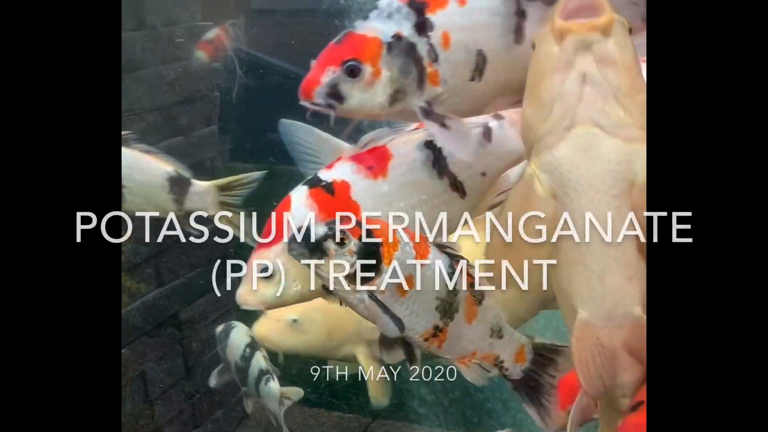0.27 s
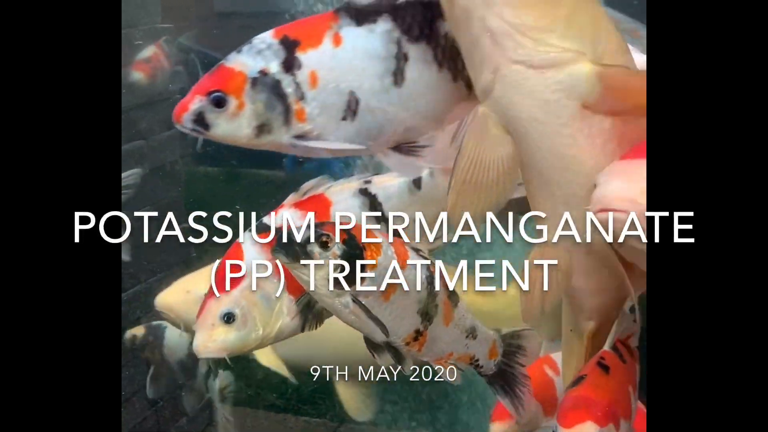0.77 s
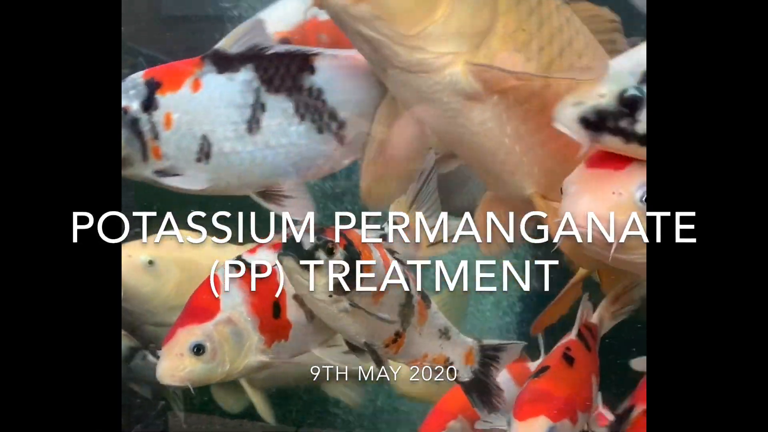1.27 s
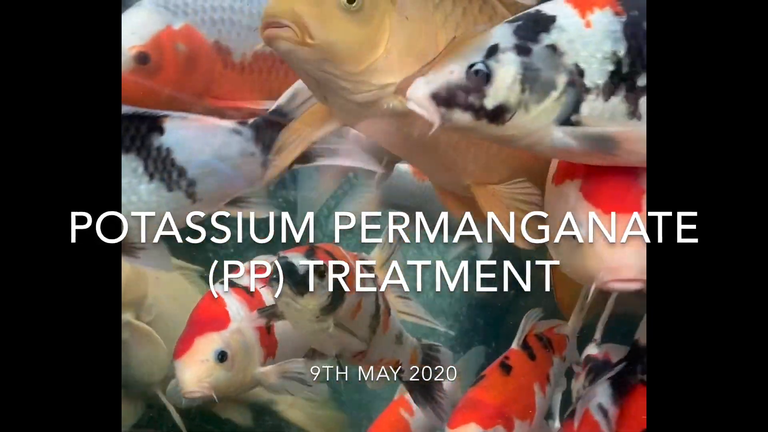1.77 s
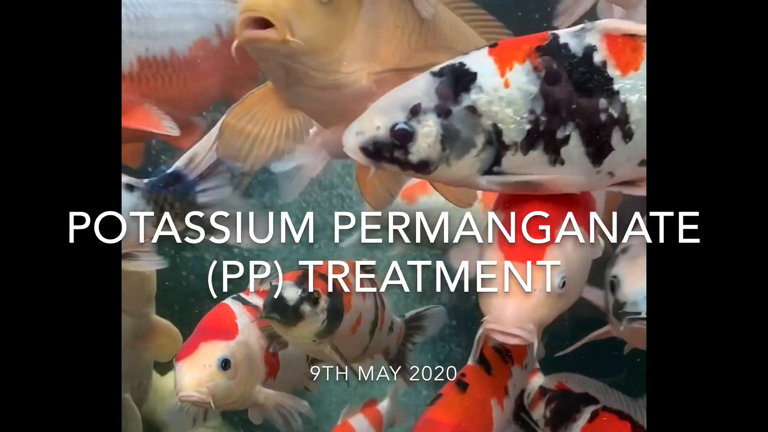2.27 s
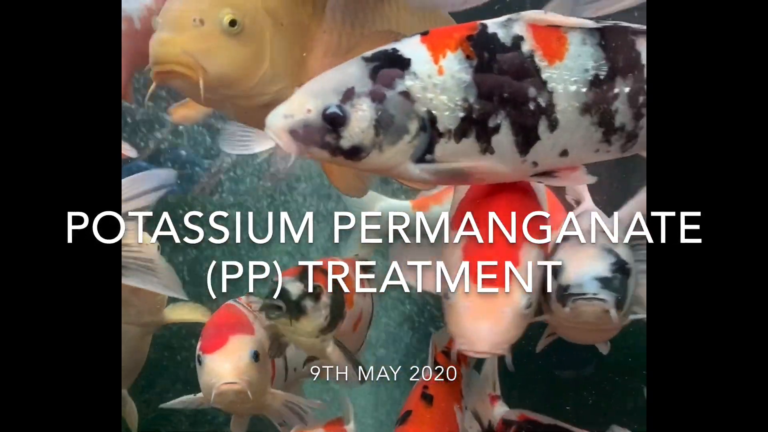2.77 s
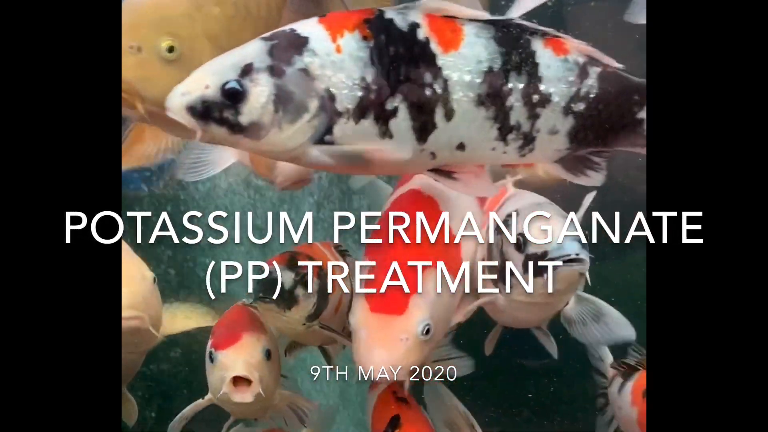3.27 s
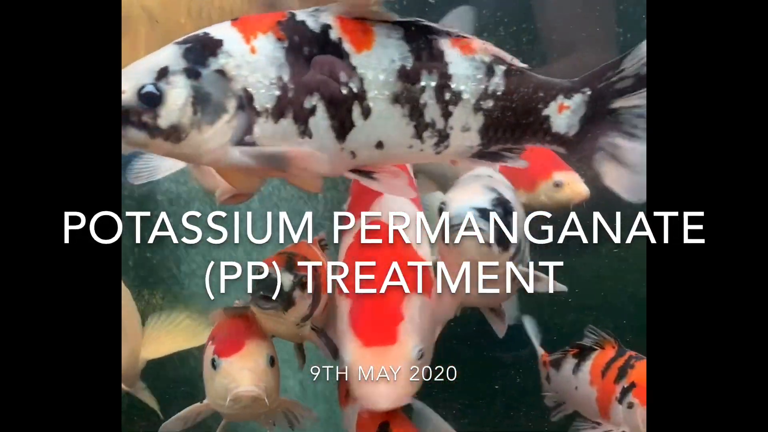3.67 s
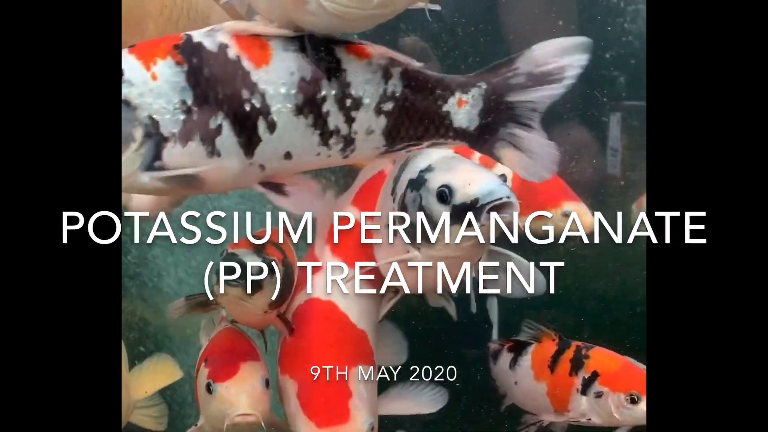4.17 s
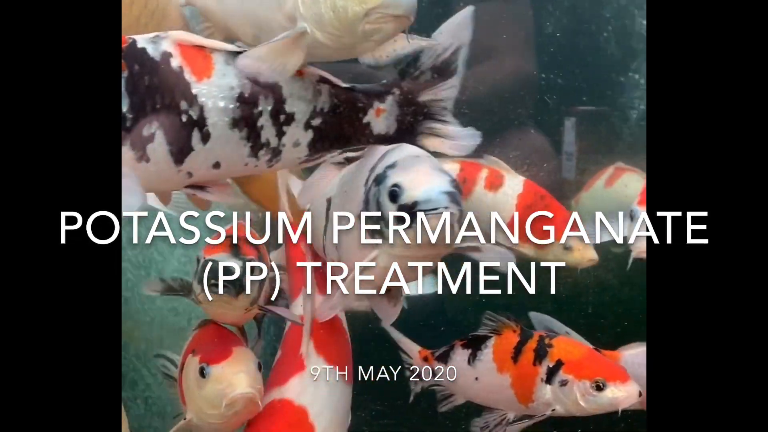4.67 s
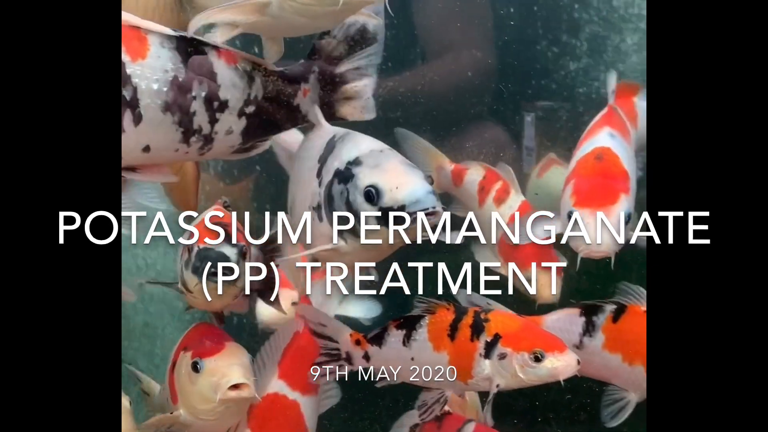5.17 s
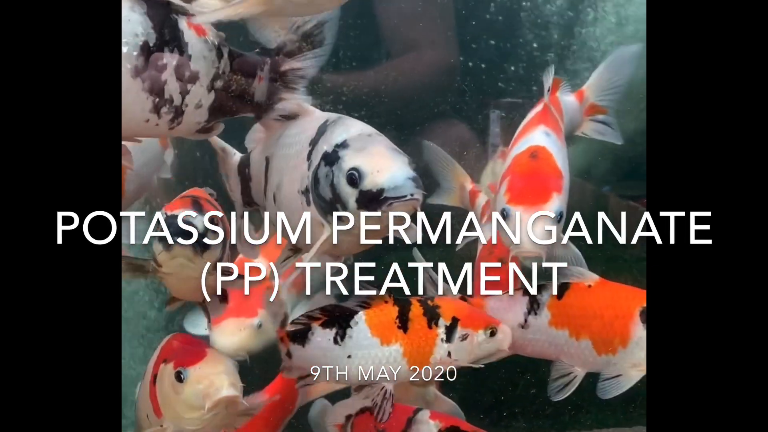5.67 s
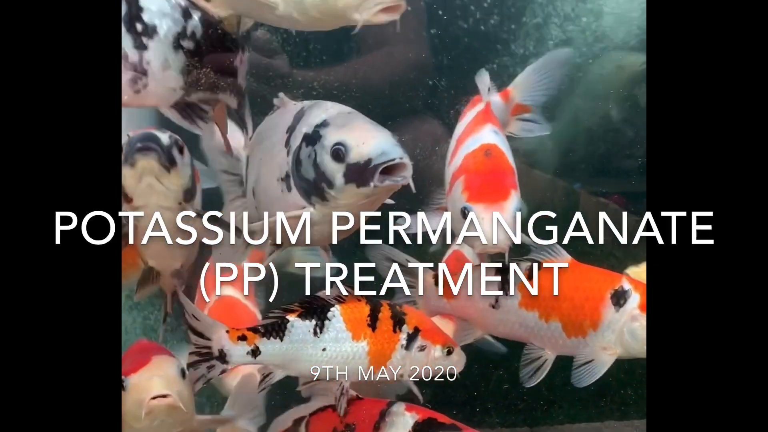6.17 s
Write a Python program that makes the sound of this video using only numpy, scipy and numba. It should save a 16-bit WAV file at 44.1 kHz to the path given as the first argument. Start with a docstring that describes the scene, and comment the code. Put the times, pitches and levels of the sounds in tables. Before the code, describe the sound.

Aerated fish pond heard close up: steady pump hum and drone under rumbling, fizzing water, with gurgling boils, small splashes and dull low thumps.

```python
"""Outdoor fish pond, beside its viewing window: pumps and aeration, heard at two close microphone ports.
An air pump hums at a drifting speed, as a sine and its octave; a water pump adds a drone and a whine.
Rising air makes the water rumble, slosh and fizz: shaped noise and swarms of ringing bubbles.
Boils well up through it, among small splashes, gliding glugs and dull, low thumps."""
import sys
import numpy as np
from scipy import signal
from scipy.fft import rfft, irfft
from scipy.io import wavfile
from numba import njit

SR = 44100
rng = np.random.default_rng(int(sys.argv[2]) if len(sys.argv) > 2 else 0)


def file_out(sig):
    """Save sig as 16-bit WAV at sys.argv[1]."""
    # one column per channel
    cols = np.atleast_2d(sig).T
    # limit, then scale
    lim = np.clip(cols, -1, 1)
    pcm = np.round(lim * 32767).astype(np.int16)
    wavfile.write(sys.argv[1], SR, pcm)


N = 283563
TIME = np.arange(N) / SR
BINS = np.fft.rfftfreq(N, 1 / SR)

# Air pump, levels before trim and waver: t/s, shaft f/Hz, hum level/dB, octave level/dB
AIR_PUMP = [(0, 41.6, -50, -68), (0.6, 41.95, -49, -66), (1.15, 42.4, -50, -50), (1.5, 45.55, -59, -63),
            (1.95, 48.8, -47.5, -46.5), (2.12, 48.6, -56, -48.5), (2.28, 49.25, -39.5, -60),
            (2.5, 49.9, -47, -62), (3.0, 49.84, -43.5, -54), (3.35, 49.06, -49.5, -46.5),
            (3.6, 49.4, -46.5, -52.5), (4.1, 49.55, -46.5, -47.5), (4.38, 47.4, -68, -60),
            (4.65, 43.1, -47, -60), (5.3, 42.94, -50.5, -50.5), (5.699, 41.7, -49, -55),
            (5.951, 41.5, -46, -59), (6.43, 41.4, -52, -59)]
# Spells in which the water pump's whine sings out: start t/s, length t/s, level/dB over a faint rest level
WHINE = [(0.428, 0.21, -61), (0.935, 0.12, -54.5), (1.05, 0.42, -58.5), (3.168, 0.092, -55),
         (3.294, 0.22, -55.5), (3.761, 0.068, -55), (3.933, 0.24, -55.5), (5.157, 0.17, -54.5),
         (5.61, 0.236, -55), (5.818, 0.25, -59), (6.19, 0.28, -55)]
WHINE_REST_DB, WHINE_EDGE_S = -67.5, 0.043  # level between spells; fade in and out of a spell

# How hard the aeration runs, used as the swing about its median: t/s, level/dB
AERATION = [(0, -55.5), (.6, -54.5), (1.5, -55), (2.05, -53), (2.6, -54), (3.2, -53.5), (3.8, -55.5),
            (4.9, -53), (6.43, -54.5)]
# Boils of air breaking the surface, before each layer's trim: crest t/s, level/dB, build-up t/s
BOILS = [(1.12, 6, 0.14), (2.04, 5, 0.16), (2.17, 7.5, 0.16), (2.43, 0, 0.089), (2.93, 4, 0.044),
         (4.16, 0, 0.25), (4.54, 7.5, 0.15), (4.64, 6.5, 0.055), (4.89, 6.5, 0.14), (5.05, 6.5, 0.08),
         (5.85, 5, 0.23), (6.041, 6, 0.093), (6.22, 0, 0.11)]
COLLAPSE_S = 0.045  # time constant after a crest

# Spectrum of moving water, before layer trims: f/Hz, level/dB per Hz
WATER = [(12, -102), (20, -87), (30, -85), (42, -67.5), (60, -60.5), (85, -66.5), (115, -64.5), (150, -70),
         (215, -75.5), (300, -74), (370, -79.5), (450, -78), (750, -82.5), (1120, -77), (1380, -86.5),
         (2700, -88.5), (3400, -89)]
# Spectrum of bursting bubbles, before layer trims: f/Hz, level/dB per Hz
FIZZ = [(1000, -104), (2600, -91.5), (3100, -85), (3600, -82.5), (4200, -87), (5300, -87), (6800, -87.5),
        (7700, -91), (8400, -87.5), (10000, -88.5), (11000, -92.5), (11900, -90.5), (14200, -95),
        (14700, -92.5), (15500, -101)]
# Resonances of the pond's surround: f/Hz, width f/Hz, level/dB
SURROUND = [(450, 120, 1), (720, 66, 3.5), (927, 97, 2.5), (1480, 115, 2), (1682, 51, 4.5), (1840, 45, -3),
            (1954, 84, 5), (2060, 50, 8.5)]

# Dull shoves of water, before trim: centre t/s, level/dB, f/Hz
THUMPS = [(0.99, -37, 175), (1.11, -32, 167), (1.396, -34, 176), (2.189, -33, 57.6), (2.207, -34, 70),
          (2.303, -42, 59), (2.487, -34, 88.5), (3.241, -29.5, 66), (4.153, -34, 104), (4.522, -35, 105),
          (4.54, -29, 125), (4.574, -39, 99), (4.607, -30, 103), (4.738, -32, 98), (4.905, -36, 90),
          (4.96, -38, 130), (5.035, -40, 185.8), (5.936, -34.5, 70)]
# Large bubbles, before trim: t/s, level/dB, starting f/Hz, glide/octaves per s
GLUGS = [(0.814, -45, 940, 5), (0.944, -46, 1075, 1), (1.054, -49, 635, 3), (1.061, -41, 500, 6.5),
         (1.068, -46, 295, -3), (1.087, -53, 412, 7), (1.098, -45, 563, 4), (1.114, -38.5, 690, -1),
         (1.113, -45, 510, 0), (1.119, -48, 905, 2), (1.379, -41, 300, -26.5), (1.944, -43, 465, 4),
         (2.015, -51, 243, 0.5), (2.021, -46, 435.5, 11), (2.043, -47, 417, 3), (2.077, -50.5, 312, -1),
         (2.094, -53, 790, -5), (2.114, -46, 412, 8), (2.143, -41.5, 480, -14), (4.414, -45, 653, 1),
         (4.494, -47, 261, -7.5), (4.508, -49, 585, 4), (4.521, -44.5, 497, 4), (4.537, -50, 530, 0),
         (4.737, -44.5, 443, -1), (4.780, -44, 705, 2), (4.844, -44, 503, -2), (4.864, -50, 324, -6),
         (4.865, -46, 734, 2), (4.874, -47, 483, 1), (4.920, -36, 1050, 2), (4.922, -46, 464, 4),
         (4.923, -46.5, 292, -1.5), (4.949, -47, 436, 8), (4.984, -43, 480, 6), (4.988, -46, 590, 2),
         (5.023, -43, 627, -3), (5.024, -40.5, 439, 1.5), (5.041, -48, 557, 4), (6.008, -50, 409, -1),
         (6.015, -38, 685, 1), (6.020, -48, 523, -3), (6.114, -43.5, 587, 1)]
# Small splashes, before the spray and droplet trims: t/s, level/dB, centre f/Hz, width f/Hz, t60/s
SPLASHES = [(0.064, -39.5, 3290, 1190, 0.18), (0.183, -42.5, 3750, 900, 0.22), (.435, -45, 6500, 3000, .22),
            (.785, -38, 3310, 704, 0.1), (0.837, -36.5, 8450, 900, 0.22), (.985, -42, 6320, 2400, 0.4),
            (1.066, -38.5, 1976, 1780, 0.17), (1.104, -44, 9550, 2980, 0.27),
            (1.554, -41, 7000, 1590, 0.12), (1.812, -37, 3300, 805, 0.11), (2.388, -40, 646, 300, 0.074),
            (2.688, -39, 2184, 1810, 0.13), (3.089, -45, 10700, 3010, 0.32),
            (3.195, -40.5, 1980, 2017, .17), (3.199, -47, 10520, 4000, 0.3), (3.43, -42, 5720, 2970, 0.3),
            (3.61, -45, 7900, 4970, 0.22), (3.737, -45, 3830, 496, 0.26), (3.897, -38, 4170, 347, 0.16),
            (4.06, -42.5, 7350, 6040, 0.3), (4.134, -39, 1680, 400.6, 0.1), (4.215, -48, 3930, 686, 0.4),
            (4.519, -43, 8100, 5900, 0.14), (4.813, -37.5, 3835, 800, 0.09),
            (4.865, -40.5, 1990, 1804, 0.3), (4.917, -37, 5350, 4080, 0.19), (4.926, -45, 8500, 900, 0.16),
            (4.955, -37, 3890, 402, 0.098), (5.108, -39.5, 5335, 895, 0.17), (5.169, -43, 3354, 815, 0.21),
            (5.235, -47, 11160, 2990, .22), (5.317, -42, 5720, 450, 0.12), (5.321, -41, 7340, 4950, 0.27),
            (5.778, -41, 4410, 400, 0.098), (5.802, -37.5, 3260, 2000, 0.18),
            (5.802, -45, 11050, 3530, 0.25), (5.925, -42, 6380, 1200, 0.27), (6.018, -37, 498, 454, 0.11),
            (6.355, -42, 1986, 2012, 0.48), (6.412, -39, 5550, 2540, 0.16)]
SPLASH_RISE_S = 0.003

# Likeness of the water at the two ports: f/Hz, likeness (1 = identical)
LIKENESS = [(40, 0.92), (120, 0.97), (250, 0.75), (450, 0.57), (700, 0.77), (1000, 0.12), (1700, 0.57),
            (2800, 0.49), (3400, 1), (13500, 1), (15000, 0.95)]
# Balance of the ports: f/Hz, left minus right level/dB
BALANCE = [(45, 1.5), (100, 1.3), (300, 4), (480, 3), (750, 1), (950, 1.8), (1300, -0.3), (2200, -0.7),
           (3050, -1.6), (3500, 0), (15000, 0)]
# Phase of the water at the ports: f/Hz, lead of left over right/rad
LEAD = [(150, 0), (400, -.6), (800, -1.7), (1000, -1.5), (1200, -.3), (2300, 1.3), (2900, .5), (3300, 1.3),
        (4000, 2.1), (4830, 3.14), (6720, 6.28), (11000, 12.57), (13280, 15.71), (15300, 18.85)]
EDGE_HZ = 15750


def amp(db):
    """Decibels to gain."""
    return 10 ** (np.asarray(db) / 20)


def unit(x):
    """Scales to rms 1."""
    return x / np.sqrt(np.mean(abs(x) ** 2) + 1e-20)


def read(points, hz):
    """Reads a table on a log-frequency axis."""
    f, value = np.transpose(points)
    return np.interp(np.log(hz + 1), np.log(f + 1), value)


def add(mix, s, sound):
    """Mixes a sound in at time s."""
    part = mix[..., max(round(s * SR), 0):][..., :sound.shape[-1]]
    part += sound[..., :part.shape[-1]]


def noise():
    """Independent white noise for two channels."""
    return rng.standard_normal((2, N))


def drift(rate_hz):
    """Random wandering of rms 1, mostly slower than the rate."""
    smoothing = np.exp(-(BINS / rate_hz) ** 2) * (BINS > 0)
    return unit(irfft(rfft(rng.standard_normal(N)) * smoothing, N))


def colour(x, gain):
    """Filters by a gain for each frequency; white input of rms 1 gets that gain per root Hz."""
    return irfft(rfft(x) * gain, N) * np.sqrt(SR / 2)


def below(hz, order):
    """Low-pass gain."""
    return 1 / np.sqrt(1 + (BINS / hz) ** (2 * order))


def above(hz, order):
    """High-pass gain that complements the low-pass in power."""
    return np.sqrt(1 - below(hz, order) ** 2)


def swell(curve):
    """A level curve in dB about its median."""
    level = np.interp(TIME, *np.transpose(curve))
    return level - np.median(level)


def boil():
    """Strength of the boils over time: each builds up and collapses exponentially; powers add."""
    power = np.zeros(N)
    for s, db, build_s in BOILS:
        envelope = np.exp(np.minimum((TIME - s) / build_s, (s - TIME) / COLLAPSE_S))
        power += (amp(db) * envelope) ** 2
    return np.sqrt(power)


@njit
def rings(total, starts, lengths, sizes, steps, bends):
    """Sums decaying sines: each sample turns and shrinks by a step, and the step itself bends upward."""
    out = np.zeros(total)
    for k in range(len(starts)):
        z, step = sizes[k] + 0j, steps[k]
        for i in range(starts[k], min(starts[k] + lengths[k], total)):
            out[i] += z.imag
            z *= step
            step *= bends[k]
    return out


def ring_bubbles(total, starts, hz, sizes, cycles, rise):
    """Rings bubbles that fade over a number of cycles while their pitch rises."""
    fade = hz / SR / cycles  # per sample
    steps = np.exp(2j * np.pi * hz / SR - fade)
    bends = np.exp(2j * np.pi * 2 * cycles * rise * fade ** 2)
    return rings(total, starts.astype(np.int64), (5 / fade).astype(np.int64), sizes, steps, bends)


def bubbles(per_s, low_hz, high_hz, cycles, spread_db, rise):
    """A swarm of ringing bubbles, each with its own size and rising pitch; flat in spectrum on average."""
    out = []
    for rows in rng.random((2, 40000, 4))[:, :max(int(per_s * N / SR), 1)]:
        when, pitch, strength, sign = rows.T
        hz = low_hz * (high_hz / low_hz) ** pitch
        strength_db = spread_db * np.minimum(-np.log(1 - strength), 4)
        sizes = hz * amp(strength_db) * np.sign(sign - .5)
        out.append(ring_bubbles(N, when * N, hz, sizes, cycles, rise))
    return unit(np.array(out)) * np.sqrt((high_hz - low_hz) / (SR / 2))


def droplets(hz, width, total, count=220, cycles=32, rise=0.012):
    """A small crowd of bubbles around one pitch; the first rings at once."""
    when, size, sign = rng.random((3, count))
    pitch = np.clip(hz + width / 2 * rng.standard_normal(count), 250, 15000)
    sizes = (.5 + size) * np.sign(sign - .5)
    return ring_bubbles(total, (when - when.min()) * total, pitch, sizes, cycles, rise)


def walls(x, t60, wet_db):
    """The pond's walls and cover add a short dense tail, whose paths keep changing as the surface heaves."""
    hop = SR // 5
    t, window = TIME[:hop], np.sin(np.linspace(0, np.pi, 2 * hop))
    decay = amp(-60 * t / t60) * (t > .003)
    padded = np.pad(x, ((0, 0), (hop, 2 * hop)))
    wet = np.zeros_like(padded)
    for i in range(0, N + hop, hop):  # a fresh tail for each overlapping stretch
        tail = rng.standard_normal((2, hop)) * decay / np.linalg.norm(decay)
        add(wet, i / SR, signal.fftconvolve(padded[:, i:i + 2 * hop] * window, tail, axes=1))
    return (x + amp(wet_db) * wet[:, hop:hop + N]) / np.hypot(1, amp(wet_db))


def tone(hz, unsteady, lag, waver_hz):
    """A motor line at both ports, wavering in level and phase."""
    waver = (drift(waver_hz) + 1j * drift(waver_hz)) / np.sqrt(2)
    line = unit(1 + unsteady * waver) * np.exp(2j * np.pi * (hz * TIME + rng.random()))
    tilt = amp(read(BALANCE, hz) / 2)
    return np.sqrt(2) * np.array([line * tilt, line * np.exp(-1j * lag) / tilt]).real


def water_pump(drone_hz=131, drone_db=-53.0, whine_hz=1157):
    """A nearly steady low drone, and a thin whine that swells in spells."""
    drone = amp(drone_db) * tone(drone_hz, unsteady=0.12, lag=0, waver_hz=3)
    whine = tone(whine_hz, unsteady=0.18, lag=-0.42, waver_hz=14)
    spells = np.zeros(N)
    for s, length, db in WHINE:
        edges = np.minimum(TIME - s, s + length - TIME) / WHINE_EDGE_S
        spells += amp(db) * np.clip(edges, 0, 1)
    return drone + np.hypot(amp(WHINE_REST_DB), spells) * whine


def air_pump(level_db=-0.25, waver_db=0.2):
    """A deep hum at the shaft's speed and its octave; each swells and sinks on its own."""
    s, hz, *levels = np.transpose(AIR_PUMP)
    turns = np.cumsum(np.interp(TIME, s, hz)) / SR
    hum = np.zeros(N)
    for harmonic, db in enumerate(levels, start=1):
        strength = amp(np.interp(TIME, s, db) + waver_db * drift(5.0))
        hum += strength * np.cos(2 * np.pi * (harmonic * turns + rng.random()))
    return np.sqrt(2) * hum * amp(level_db) * amp([[.35], [-.35]])  # slightly louder on the left


def churn(level_db=-1.5, boil_db=-8, boil_low_hz=90, boil_high_hz=240, follow=0.7, heave_db=0.8):
    """The aeration keeps the whole body of water rumbling; each boil adds a push in the upper bass."""
    gain = amp(read(WATER, BINS) + level_db)
    rumble = colour(noise(), gain * below(203, order=4))
    push = colour(noise(), gain * above(boil_low_hz, order=4) * below(boil_high_hz, order=6))
    heave = amp(follow * swell(AERATION) + heave_db * drift(3.3))
    return rumble * heave + amp(boil_db) * boil() * push


def thumps(level_db=0.3, cycles=0.85):
    """Shoves of water: the pressure dips, then rebounds."""
    out = np.zeros((2, N))  # direct sound only; the scattered channel stays silent
    for s, db, hz in THUMPS:
        turns = np.clip((TIME - s) * hz, -10, 10)
        out[0] += amp(db + level_db) * np.sin(2 * np.pi * turns) * np.exp(-(turns / cycles) ** 2)
    return out


def fizz(hiss_db=-3, pops_db=-4.0, pings_db=-10, puff_db=0.81, flutter_db=0.76):
    """Thousands of tiny bubbles burst above the air stones in uneven puffs; a few ring on as pings."""
    pops = walls(bubbles(2400, 1812, 16100, cycles=15, spread_db=2.5, rise=0.014), t60=0.18, wet_db=6)
    pings = walls(bubbles(300, 1900, 11000, cycles=42, spread_db=0.5, rise=0.0029), t60=0.098, wet_db=1)
    spray = amp(hiss_db) * noise() + amp(pops_db) * pops + amp(pings_db) * pings
    level = swell(AERATION) + puff_db * drift(18.0) + flutter_db * drift(30)
    return colour(spray, amp(read(FIZZ, BINS))) * amp(level)


def slosh(wash_db=-4, gurgle_db=-4, crackle_db=-8, froth_db=-10, blub_db=-2,
          low_boil_db=-1.5, high_boil_db=-11, flutter_db=0.92):
    """The surface is a wash with gurgling and crackling; each boil brings up a crowd of larger bubbles."""
    gurgle = walls(bubbles(1800, 332.8, 4043, cycles=8.1, spread_db=4.5, rise=0.014), t60=0.093, wet_db=-0.5)
    crackle = walls(bubbles(260, 1438, 3365, cycles=6.2, spread_db=4.0, rise=0.02), t60=0.026, wet_db=-8)
    blubs = walls(bubbles(340, 332, 796, cycles=6.3, spread_db=0.0, rise=0.013), t60=0.086, wet_db=-5)
    water = amp(wash_db) * noise() + amp(gurgle_db) * gurgle + amp(crackle_db) * crackle
    welling = amp(froth_db) * noise() + amp(blub_db) * blubs

    peaks_db = sum(db / (1 + (2 * (BINS - hz) / width) ** 2) for hz, width, db in SURROUND)
    gain = amp(read(WATER, BINS) + peaks_db) * above(175, order=4) * below(2680, order=5)
    deep = below(1000, order=3) ** 2  # splits the surface into a low and a high band
    surge = boil()
    low = colour(water, gain * deep) + colour(welling, gain * deep) * amp(low_boil_db) * surge
    high = colour(water, gain * (1 - deep)) * np.hypot(1, amp(high_boil_db) * surge)
    return (low + high) * amp(flutter_db * drift(21))


def glugs(level_db=1.5, swell_cycles=3.0):
    """Pockets of air pinch off: each swells in a few cycles, then rings away as its pitch glides."""
    out, t = np.zeros((2, N)), TIME[:SR // 8]
    quarter_turn = np.array([[0], [np.pi / 2]])  # between direct and scattered sound
    for s, db, hz, glide in GLUGS:
        u = t * hz / swell_cycles
        turns = np.cumsum(hz * 2 ** (glide * t)) / SR
        envelope = u * np.exp(1 - u)
        add(out, s, amp(db + level_db) * envelope * np.sin(2 * np.pi * turns + quarter_turn))
    return out


def splashes(spray_db=-7, droplets_db=-5.0):
    """Thrown drops land: a sudden cluster of ringing bubbles in a little spray, dying away between the walls."""
    out, t = np.zeros((2, N)), TIME[:SR // 4]
    f = np.fft.rfftfreq(len(t), 1 / SR)
    for s, db, hz, width, t60 in SPLASHES:
        band = 1 / (1 + ((f - hz) / width) ** 2) ** 2
        spray = unit(irfft(rfft(rng.standard_normal((2, len(t)))) * band, len(t)))
        cluster = np.array([unit(droplets(hz, width, len(t))) for _ in range(2)])
        envelope = amp(db - 60 * t / t60) * (1 - np.exp(-t / SPLASH_RISE_S))
        add(out, s, (amp(spray_db) * spray + amp(droplets_db) * cluster) * envelope)
    return out


def ports(pair):
    """Direct water sound reaches both ports, partly scattered at the right; balance and phase vary with pitch."""
    direct, scattered = rfft(pair)
    same = np.clip(read(LIKENESS, BINS), 0, 1)
    tilt = amp(read(BALANCE, BINS) / 2)
    lead = np.interp(BINS, *np.transpose(LEAD))
    right = (same * direct + np.sqrt(1 - same ** 2) * scattered) * np.exp(-1j * lead)
    return irfft(np.array([direct * tilt, right / tilt]), N)


def scene():
    """Water through the two ports, with both pumps."""
    water = churn() + slosh() + fizz() + splashes() + glugs() + thumps()
    return ports(water) + air_pump() + water_pump()


def record(dry):
    """Band limit: a steep low-pass takes off the top of the treble."""
    lowpass = signal.firwin(1023, EDGE_HZ, window=("kaiser", 9), fs=SR)
    return signal.oaconvolve(dry, lowpass[None], "same")


dry = scene()
out = record(dry)
file_out(out)
```